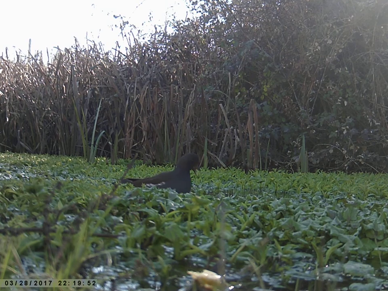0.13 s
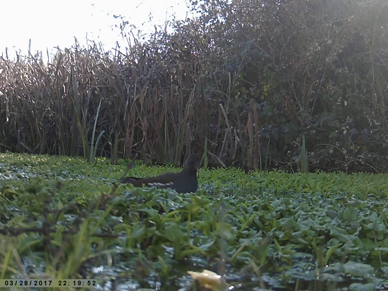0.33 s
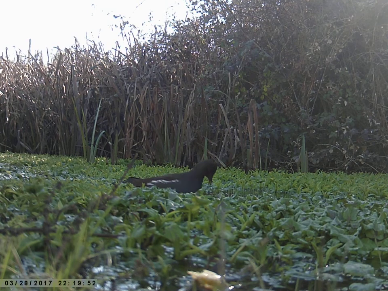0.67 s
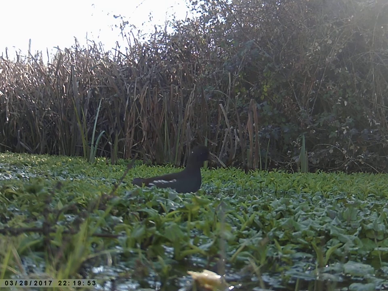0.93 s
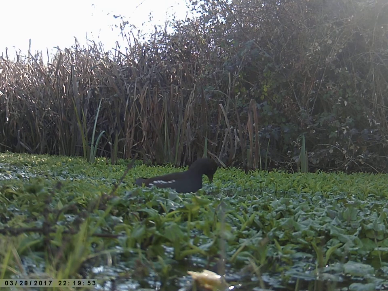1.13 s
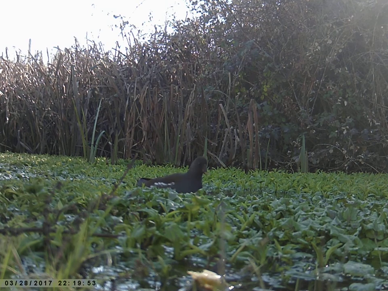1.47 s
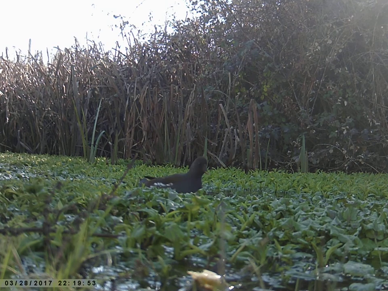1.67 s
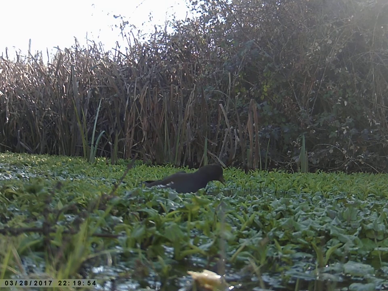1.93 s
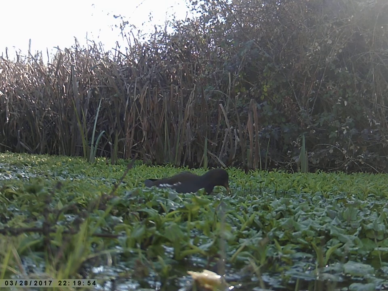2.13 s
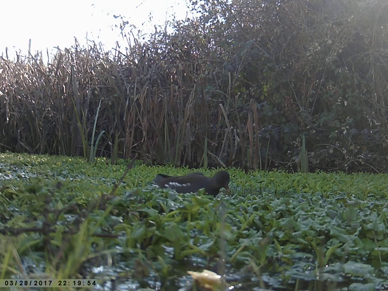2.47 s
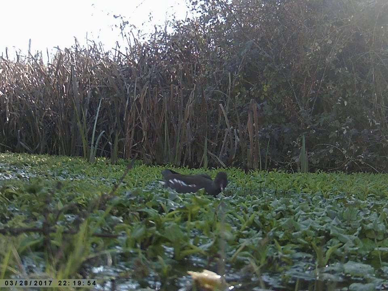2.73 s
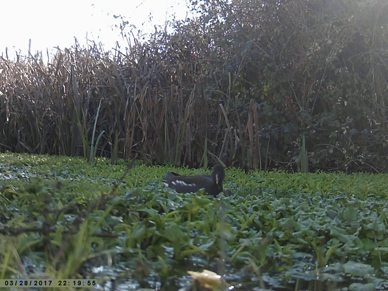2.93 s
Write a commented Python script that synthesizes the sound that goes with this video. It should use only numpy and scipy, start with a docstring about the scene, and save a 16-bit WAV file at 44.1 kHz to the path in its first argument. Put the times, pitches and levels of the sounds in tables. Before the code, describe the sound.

Close, harsh waterbird calls come in two quick bursts, each with a brief clean whistle, and thin peeps fall between them. Behind are rumbling air, a faint far machine drone, small birds in the reeds and soft camera thumps.

```python
"""A moorhen on a weedy pond gives harsh two-voiced squawks that flip into clean whistles, with short
peeps between. Both sides of its syrinx sound together in a squawk, one side alone in a whistle.
Small birds slur faintly in the reeds; far machinery drones under a low rumble of air.
Soft paired thumps with a little hiss, probably the camera's lens motor, come and go."""
import sys
import numpy as np
from scipy import signal
from scipy.fft import rfft, irfft
from scipy.io import wavfile
from scipy.ndimage import uniform_filter1d

SR = 44100
rng = np.random.default_rng(int(sys.argv[2]) if len(sys.argv) > 2 else 0)


def dump(signal):
    """Clip the signal to [-1, 1] and save it as 16-bit WAV at the path in sys.argv[1]."""
    limited = np.clip(np.atleast_2d(signal).T, -1, 1)
    pcm = np.round(limited * 32767).astype(np.int16)
    wavfile.write(sys.argv[1], SR, pcm)


N = 136710
T = np.arange(N) / SR
BAND_LIMIT_HZ = 15650


def amp(db):
    """Decibels to gain."""
    return 10 ** (np.asarray(db) / 20)


def unit(x):
    """Scales to rms 1."""
    return x / np.sqrt(np.mean(x ** 2) + 1e-20)


def eq_db(points, hz):
    """Level of an EQ curve at hz, joined on a log-frequency axis."""
    f, db = np.transpose(points)
    return np.interp(np.log(abs(hz) + 1), np.log(f + 1), db)


def curves(rows):
    """Times and smoothly joined columns of a breakpoint table."""
    times, *columns = np.transpose(rows)
    t = np.arange(times[0], times[-1], 1 / SR)
    return [t] + [uniform_filter1d(np.interp(t, times, c), size=130, mode="nearest") for c in columns]


def add(mix, start, sound):
    """Mixes a sound in at a start time in seconds."""
    part = mix[max(round(start * SR), 0):][:len(sound)]
    part += sound[:len(part)]


def noise(eq):
    """Steady noise coloured by an EQ curve, at rms 1."""
    colour = amp(eq_db(eq, np.fft.rfftfreq(N, 1 / SR)))
    return unit(irfft(rfft(rng.standard_normal(N)) * colour, N))


def wander(rate_hz, samples=N):
    """Smooth random modulation up to a rate."""
    rolloff = 1 + (np.fft.rfftfreq(N, 1 / SR) / rate_hz) ** 4
    return unit(irfft(rfft(rng.standard_normal(N)) / rolloff, N))[:samples]


def phase(hz):
    """Running phase of a pitch curve."""
    return 2 * np.pi * np.cumsum(hz) / SR


def air():
    """A low, slightly lumpy rumble that swells, under a steady thin hiss."""
    # colours of the air bed and the hiss: f/Hz, level/dB
    bed_eq = [(12, -31), (20, -12.5), (53, 3), (80, -3.5), (112, -5), (140, -7), (161, -9), (219, -8.5),
              (245, -12), (323, -12), (613, -19.5), (667, -18.5), (1970, -32.5), (4680, -40.5),
              (15500, -46.5)]
    hiss_eq = [(1000, -31), (2500, 0.5), (4000, 1.5), (6500, 0.5), (9000, -1.5), (15000, -7)]
    # swell of the low air: t/s, gain/dB
    swell_points = [(0, 2), (.17, 0), (.25, 4.5), (.33, 4), (.37, 0), (.42, 2.5), (.5, -1), (.75, -1.5),
                    (1.15, -1.5), (1.3, 0), (1.6, -1.5), (1.85, -0.5), (1.92, 3), (2.0, -1), (2.07, 5),
                    (2.27, 4), (2.34, 0.5), (2.7, 0), (3.1, 0.5)]
    bed = amp(-59.5) * noise(bed_eq)
    rumble = signal.sosfiltfilt(signal.butter(2, 1800, fs=SR, output="sos"), bed)
    treble = bed - rumble
    swell = amp(np.interp(T, *np.transpose(swell_points)) + 1.5 * wander(15))
    return rumble * swell + treble + amp(-75.5) * noise(hiss_eq)


def drone(hz, harmonics_db, drift=0.008, flutter_db=1.3):
    """A machine's wavering harmonics; the higher ones fade in and out more."""
    turn = phase(hz * (1 + drift * wander(8.9)))
    return np.sqrt(2) * sum(amp(db + flutter_db * np.sqrt(k) * wander(9)) * np.sin(k * turn)
                            for k, db in enumerate(harmonics_db, 1))


def machinery():
    """Two far drones: the main one swells and dips, a fainter one holds above it."""
    # fader of the main drone: t/s, level/dB
    fader = [(0.0, -66), (.2, -58), (0.33, -52), (0.37, -63), (0.41, -51.5), (0.45, -60), (.7, -60),
             (.95, -57.5), (1.2, -61), (2.0, -56.5), (2.07, -51.5), (2.19, -56), (2.24, -52), (2.36, -59),
             (2.56, -59), (2.65, -73), (2.72, -59.5), (3.1, -61)]
    main = amp(np.interp(T, *np.transpose(fader))) * drone(hz=109.1, harmonics_db=[-1, -10.5, -16.5, -20])
    return main + drone(hz=177.9, harmonics_db=[-69.5, -80])


def lens_motor(rise_s=0.0043, fall_s=0.009, fade_s=0.055, body_db=8):
    """Each move pushes the microphone one way, hisses briefly, and pushes it back on stopping."""
    # motor moves: start/s, length/s, starting thump/dB, stopping thump/dB, hiss/dB
    moves = [(0.137, 0.073, -45, -40.5, -72.5), (0.259, 0.055, -42, -46.5, -68.5),
             (0.533, 0.071, -45.5, -43.5, -72.5), (0.803, 0.066, -44, -42, -72.5),
             (1.195, 0.08, -41.5, -43, -72.5), (1.331, 0.013, -47, -48.5, -73.5),
             (1.469, 0.046, -46.5, -43, -72), (1.882, 0.044, -48, -46, -71),
             (2.144, 0.047, -49, -48, -72.5), (2.248, 0.026, -44, -58, -72.5), (2.53, 0.042, -46, -46, -73),
             (2.795, 0.052, -48, -47, -76.5)]
    # colours of the motor's hiss and its low body: f/Hz, level/dB
    hiss_eq = [(500, -5), (1200, 1), (2000, -2.5), (6000, 2.5), (10000, -7.5), (15000, -9)]
    body_eq = [(60, -20), (200, 5), (500, -7), (1000, -12), (2000, -25.5), (5000, -23)]
    thumps, running = np.zeros((2, N))
    for start, length, start_db, stop_db, hiss_db in moves:
        age = T - start
        for t, push in ((age, -amp(start_db)), (age - length, amp(stop_db))):
            width_s = np.where(t < 0, rise_s, fall_s)
            thumps += push * np.exp(-0.5 * (t / width_s) ** 2)
        gate = (age > 0) & (age < length + fall_s)
        running += amp(hiss_db) * gate * np.exp(-abs(age) / fade_s)
    hiss = noise(hiss_eq) + amp(body_db) * noise(body_eq)
    return thumps + uniform_filter1d(running, size=600) * hiss


def knock(start_s=0.855, length_s=0.045, hz=73.5, db=-47):
    """One soft, dull bump on the camera body."""
    age = T - start_s
    progress = np.clip(age / length_s, 0, 1)
    return amp(db) * np.sin(np.pi * progress) * np.sin(2 * np.pi * hz * age)


def reeds(x, db, t60_s, predelay_s=0.011):
    """Scatter from the reed bed: a short reverb tail, wet only."""
    t = T[:SR // 2]
    tail = rng.standard_normal(len(t)) * amp(-60 * t / t60_s) * (t > predelay_s)
    return amp(db) * signal.fftconvolve(x, tail / np.linalg.norm(tail))[:N]


def small_birds(jitter=0.009, flutter_db=2.0):
    """Far birds' faint gliding notes, fluttering on their way through the reeds."""
    # slurred notes: start/s, length/s, first f/Hz, last f/Hz, level/dB
    slurs = [(0.847, .02, 2520, 3000, -65), (1.292, .12, 4020, 3900, -74), (1.653, 0.033, 2890, 3150, -70),
             (1.82, 0.042, 2690, 3340, -76.5), (2.337, .03, 2490, 2920, -73.5),
             (2.718, 0.026, 2385, 2630, -75), (2.885, 0.024, 5050, 5450, -68.5),
             (2.903, 0.032, 3780, 4020, -68), (2.94, 0.028, 5460, 6150, -72.5),
             (2.953, .03, 2680, 2910, -72), (2.98, 0.032, 6050, 4640, -63), (3.006, 0.042, 2380, 3390, -68),
             (3.005, 0.065, 4560, 3650, -73.5)]
    notes = np.zeros(N)
    for start, length, first_hz, last_hz, db in slurs:
        progress = np.arange(0, length, 1 / SR) / length
        glide_hz = first_hz + (last_hz - first_hz) * progress
        hz = glide_hz * (1 + jitter * wander(220, len(progress)))
        envelope = amp(db + flutter_db * wander(90, len(progress))) * np.sin(np.pi * progress)
        add(notes, start, envelope * np.sin(phase(hz)))
    return notes


def bill_hiss(calls, smooth_s=0.012):
    """Air through the moorhen's open bill: a thin hiss that grows with the call's loudness."""
    # colour of the hiss: f/Hz, level/dB
    hiss_eq = [(1200, -25), (2800, 3), (4500, 5), (7000, 2), (9500, 0), (13500, -1), (15500, -5)]
    loudness = np.sqrt(abs(uniform_filter1d(calls ** 2, size=int(smooth_s * SR))))
    return amp(-51.5) * np.sqrt(loudness) * noise(hiss_eq)


def peep(start, length, low_hz, high_hz, db, high_db, sharp, upturn, overtones_db,
         jitter=0.0085, flutter_db=1.0):
    """Two voices start sharp, settle and may bend at the end, under one arch of loudness."""
    progress = np.arange(0, length, 1 / SR) / length
    glide = 1 + sharp * (1 - progress) ** 3.6 + upturn * progress ** 3.6
    low, high = (phase(hz * glide * (1 + jitter * wander(400, len(glide)))) for hz in (low_hz, high_hz))
    voices = np.sin(low) + amp(high_db) * np.sin(high)
    overtones = np.sin(2 * low) + amp(high_db) * np.sin(low + high) / 2
    envelope = amp(db + flutter_db * wander(200, len(glide))) * np.sin(np.pi * progress) ** 1.6
    return start, envelope * (voices + amp(overtones_db) * overtones)


def whistle(rows, jitter=0.0022, octave_db=-41, twelfth_db=-43):
    """One side of the syrinx alone: nearly a sine."""
    t, hz, db = curves(rows)
    turn = phase(hz * (1 + jitter * wander(300, len(t))))
    tone = np.sin(turn) + amp(octave_db) * np.sin(2 * turn) + amp(twelfth_db) * np.sin(3 * turn)
    return t[0], amp(db) * tone


def rasp(age, beat_hz, burst_s, fade_s=0.014, sustain_db=-10):
    """Air puffing at the beat rate of the two voices, strongest while they start up."""
    # colour of the rasp: f/Hz, level/dB
    rasp_eq = [(1500, -35), (2800, -0.5), (4000, -12), (5400, 3), (6600, -1), (7600, -11), (9000, -14.5),
               (11000, -19), (15000, -26)]
    fades = np.clip(np.minimum(age, age[-1] - age) / fade_s, 0, 1) ** 2
    burst = np.exp(-(age / burst_s) ** 4)
    puffs = (1 + np.cos(phase(beat_hz))) / 2
    return fades * (burst + amp(sustain_db)) * puffs * noise(rasp_eq)[:len(age)]


def squawk(rows, trims_db, top_hz, jitter, shimmer_db, rasp_db, rasp_s, flutter_db=1.0):
    """Both sides of the syrinx sound at once and modulate each other; throat and beak shape the tone."""
    # overtones the two voices make together: multiple of the low voice, multiple of the high voice
    combinations = [(2, 0), (3, 0), (4, 0), (1, 1), (0, 2), (-1, 2), (2, 1), (4, -1), (3, -1), (-1, 3),
                    (1, 2), (-2, 3)]
    # throat resonance: f/Hz, gain/dB
    throat_eq = [(800, -50), (1750, -17.5), (2080, -28.5), (2350, -11.5), (2750, -5.5), (3300, -3),
                 (4000, 3), (5100, -4), (6400, -6), (7600, -6), (8400, -7), (12000, -17)]
    t, low_hz, high_hz, low_db, high_db, overtones_db = curves(rows)
    age = t - t[0]
    shake = jitter * (1 + 0.91 * np.exp(-age / 0.025))  # the pitch is least steady at the attack
    low_hz, high_hz = (hz * (1 + shake * wander(450, len(t))) for hz in (low_hz, high_hz))
    tones = [(low_hz, low_db), (high_hz, high_db)]
    for (m, n), trim in zip(combinations, trims_db):
        tones.append((m * low_hz + n * high_hz, overtones_db + trim + flutter_db * wander(70, len(t))))
    voice = 0
    for hz, db in tones:
        beak_cut_db = np.clip(0.5 * (hz - top_hz), 0, 26)  # the beak cuts off the top
        gain = amp(db + eq_db(throat_eq, hz) - beak_cut_db) * (abs(hz) < BAND_LIMIT_HZ)
        offset = 2 * np.pi * rng.random()  # the throat puts the tones out of step
        voice += gain * np.sin(phase(hz) + offset)
    breath = amp(rasp_db) * rasp(age, high_hz - low_hz, rasp_s)
    shimmer = amp(shimmer_db * wander(480, len(t)))
    return t[0], voice * shimmer + breath


def moorhen():
    """The bird's dry calls: four squawks, two of which flip into whistles, and six peeps."""
    # squawk gestures, levels ahead of the throat:
    # t/s, low voice f/Hz, high voice f/Hz, low voice level/dB, high voice level/dB, overtone level/dB
    rising = [(.212, 1650, 2196, -73, -70, -70), (.223, 1773, 2252, -46, -46, -50.5),
              (.233, 1890, 2644, -48, -51, -51), (.242, 2180, 2896, -47, -46, -48),
              (.249, 2520, 3255, -46, -46, -50), (.256, 2806, 3400, -44.5, -47, -50),
              (.268, 3300, 3830, -45, -53, -46), (.276, 3580, 3880, -43, -51, -51.5),
              (.284, 3350, 3990, -45, -50, -55), (.291, 3330, 4000, -41, -80, -65),
              (.299, 3270, 4000, -39.5, -90, -64), (.307, 3460, 4000, -47.5, -90, -70),
              (.314, 3750, 4000, -58, -90, -82)]
    short = [(.371, 2200, 4300, -75, -64, -77), (.376, 2380, 4105, -57, -60, -54),
             (.381, 2600, 3850, -51, -50, -51), (.392, 2750, 3660, -48.5, -40.5, -56),
             (.401, 2600, 3770, -67, -38, -68), (.410, 2554, 3974, -52, -36, -51),
             (.421, 2674, 4270, -39.5, -53, -66), (.431, 2970, 4400, -44.5, -55, -60),
             (.440, 2800, 4370, -48, -61, -62), (.451, 3040, 4700, -72, -82, -80)]
    long = [(2.028, 1616, 2790, -75, -73, -65), (2.034, 1682, 2857, -61, -61, -53),
            (2.044, 1810, 3030, -54, -58, -53), (2.054, 1950, 3310, -48, -56, -44.5),
            (2.066, 2030, 3240, -44, -46, -42.5), (2.08, 2055, 3280, -47, -45.5, -44.5),
            (2.096, 2063, 3220, -52, -52, -45.5), (2.109, 2054, 3160, -55, -52.5, -42),
            (2.130, 2110, 3350, -46, -50, -41), (2.148, 2150, 3375, -56, -49, -40.5),
            (2.162, 2215, 3410, -54, -51, -46.5), (2.173, 2235, 3400, -55, -50, -46),
            (2.182, 2060, 3600, -75, -68, -64)]
    flick = [(2.198, 1900, 3800, -85, -72, -80), (2.202, 2300, 4400, -66, -47, -66),
             (2.206, 2800, 5500, -51, -50, -66), (2.209, 3150, 6100, -44, -66, -67),
             (2.214, 3330, 6600, -39.5, -78, -66), (2.218, 3750, 6780, -57, -90, -82),
             (2.221, 4900, 7070, -58, -90, -90)]
    # overtone balance, one entry for each combination in squawk(): gain/dB
    rising_trims = [3, -6, -4, -2, -2.5, -8, -5, -17, -16, -14, -17, -24]
    short_trims = [0.5, -7.5, -30, -7, -19, -4.5, -24, -22, -13, -15, -34, -28]
    long_trims = [-3, -8, -14, -9, -12, -22, -4, -19, -33, -23, -16, -21]
    # one contour for each whistle: t/s, f/Hz, level/dB
    whistles = [
        [(.302, 4430, -68), (.313, 4460, -52), (.321, 4396, -38), (.329, 4460, -32), (.334, 4505, -33),
         (.339, 4700, -35), (.343, 4720, -54), (.347, 4240, -47), (.352, 3640, -73)],
        [(2.218, 4750, -53), (2.223, 5130, -47), (2.228, 4884, -39), (2.236, 5016, -32.5), (2.244, 5053, -35.5),
         (2.251, 5000, -44), (2.258, 4930, -50), (2.268, 5300, -82)],
    ]
    # peeps: start/s, length/s, low voice f/Hz, high voice f/Hz, level/dB, high voice/dB re low,
    # sharp start/fraction of pitch, final upturn/fraction of pitch, overtones/dB re low
    peeps = [(.59, 0.053, 4900, 6300, -66, -16, 0.15, 0, -35),
             (0.723, .033, 6020, 7220, -43, -16, 0.06, -.015, -35),
             (.834, .035, 4960, 5750, -44.5, -3, 0.19, 0, -24),
             (0.945, .036, 4880, 5700, -44.5, -1.5, 0.18, .06, -26),
             (1.099, 0.026, 4750, 6250, -69, -7, 0.04, 0, -35),
             (1.878, 0.043, 5210, 5730, -39.5, -8, .04, 0, -39)]
    notes = [
        squawk(rising, rising_trims, top_hz=8600, jitter=.0044, shimmer_db=1, rasp_db=-59, rasp_s=.054),
        squawk(short, short_trims, top_hz=8000, jitter=.0048, shimmer_db=.86, rasp_db=-55, rasp_s=.02),
        squawk(long, long_trims, top_hz=6900, jitter=.0036, shimmer_db=.8, rasp_db=-53, rasp_s=.032),
        squawk(flick, short_trims, top_hz=6700, jitter=.0047, shimmer_db=3, rasp_db=-68, rasp_s=.015)]
    notes += [whistle(contour) for contour in whistles]
    notes += [peep(*row) for row in peeps]
    calls = np.zeros(N)
    for start, sound in notes:
        add(calls, start, sound)
    return calls


def scene():
    """The moorhen close and nearly dry, small birds wetter, over air, machinery and camera noise."""
    calls, slurs = moorhen(), small_birds()
    near = calls + bill_hiss(calls) + reeds(calls, db=-21, t60_s=0.067)
    far = slurs + reeds(slurs, db=-9, t60_s=0.18)
    background = machinery() + air() + lens_motor() + knock()
    return (background + far + near)[None]


def record(dry):
    """A steep low-pass trims the very top of the mix."""
    lowpass = signal.firwin(511, BAND_LIMIT_HZ, window=("kaiser", 9), fs=SR)
    return signal.oaconvolve(dry, lowpass[None], "same")


dry = scene()
out = record(dry)
dump(out)
```